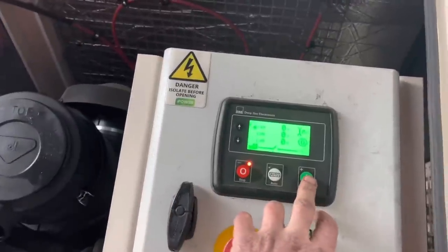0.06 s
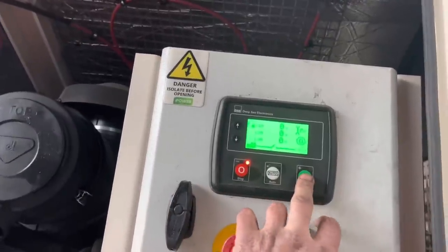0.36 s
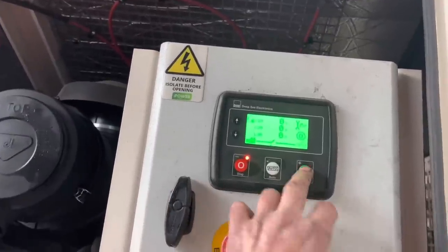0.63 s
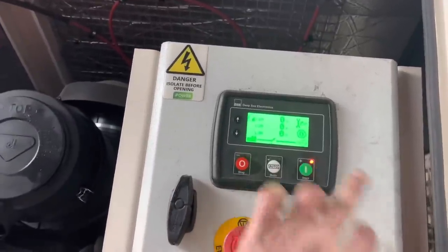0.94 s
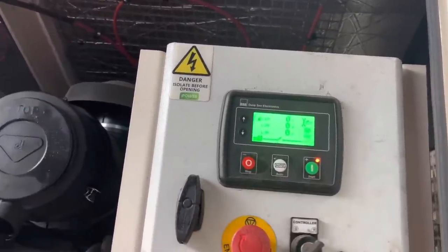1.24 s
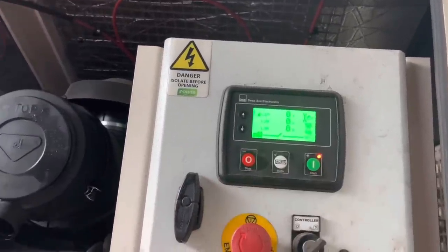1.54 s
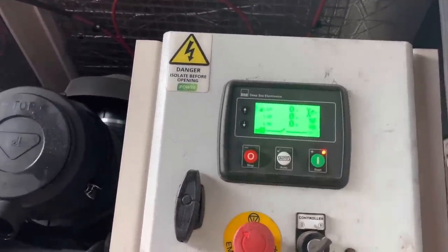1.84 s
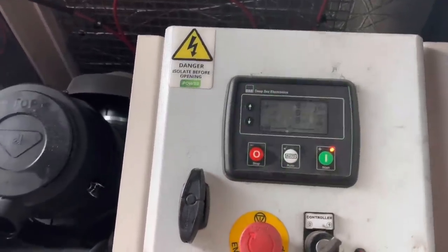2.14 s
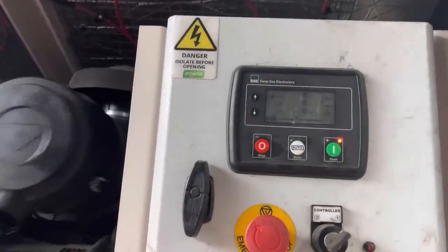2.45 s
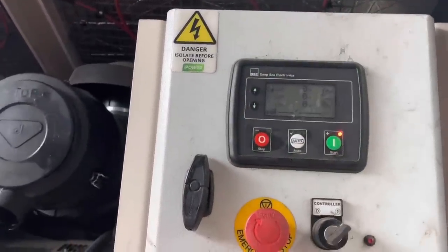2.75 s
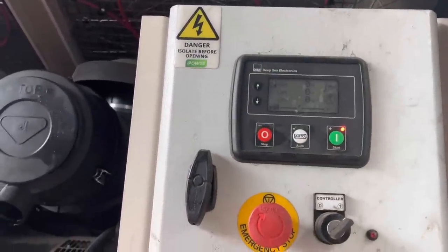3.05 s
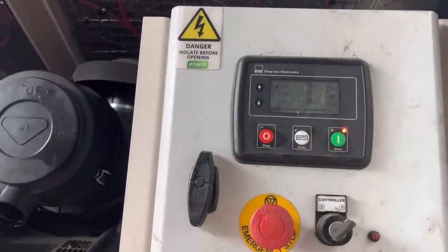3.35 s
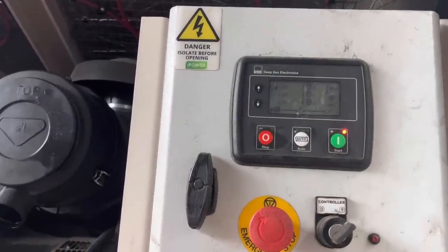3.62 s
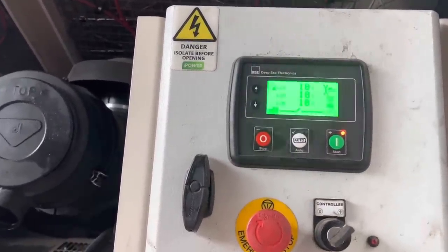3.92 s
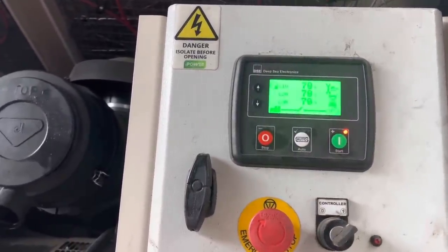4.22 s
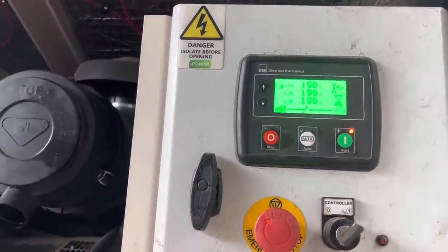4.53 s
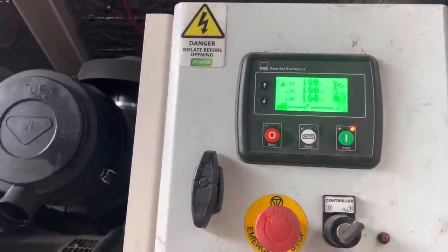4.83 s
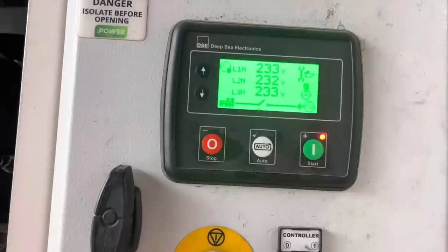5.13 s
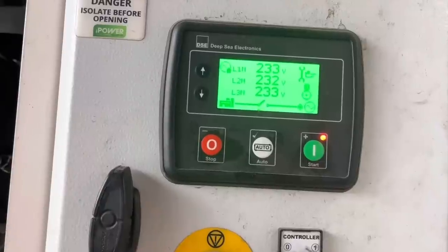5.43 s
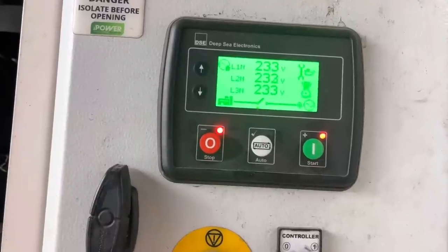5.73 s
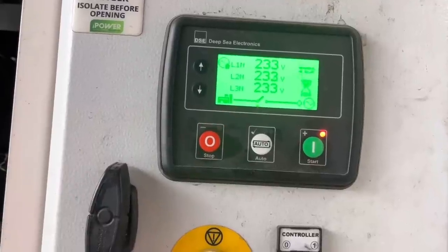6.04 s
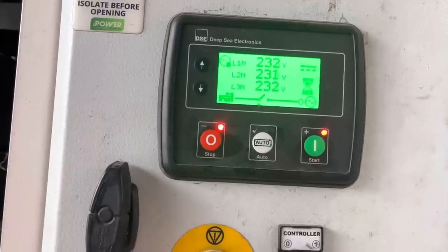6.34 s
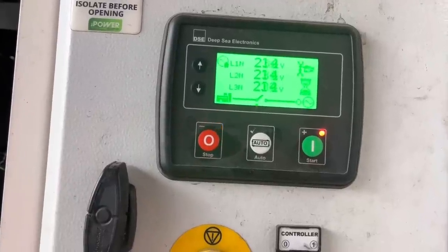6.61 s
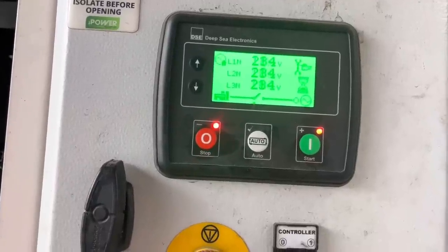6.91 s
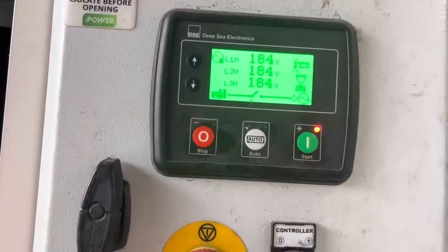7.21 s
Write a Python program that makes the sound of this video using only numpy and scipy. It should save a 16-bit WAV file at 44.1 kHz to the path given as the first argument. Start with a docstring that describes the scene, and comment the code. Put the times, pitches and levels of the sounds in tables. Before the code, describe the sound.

Over a low yard rumble, a small pump buzzes faintly, a sleeve swishes and a panel button clicks. A starter clunks in and cranks with a rasping whine. The diesel generator catches, revs up loudly and settles into a booming, slightly limping knock. Then the fuel is cut and the engine slows, chugging with ticking gears. It is all heard from close by.

```python
"""A yard rumbles low and a small pump buzzes; a sleeve swishes and a button clicks on a generator's panel.
The starter slams in and cranks a four-cylinder diesel, which catches, overshoots and settles to a limping knock.
Then the fuel is cut back and it coasts down, its slack gears ticking.
One crank angle times the engine's sounds: periodic pressure pulses boom through the exhaust,
while combustion and metal impacts excite the resonances of block, head and canopy."""
import sys
import numpy as np
from scipy import signal
from scipy.fft import rfft, irfft, next_fast_len
from scipy.io import wavfile
from scipy.ndimage import uniform_filter1d, map_coordinates

SR = 44100
rng = np.random.default_rng(int(sys.argv[2]) if len(sys.argv) > 2 else 0)


def master_out(mix):
    """Clip the mix to full scale and print it as 16-bit PCM to the path in sys.argv[1]."""
    frames = np.transpose(np.atleast_2d(mix))
    ceiling = np.clip(frames, -1, 1)
    pcm = np.round(ceiling * 32767).astype(np.int16)
    wavfile.write(sys.argv[1], SR, pcm)


N = 329427


def amp(db):
    """Decibels to amplitude ratio."""
    return np.exp(np.asarray(db) * (np.log(10) / 20))


def unit(x):
    """Normalisation to rms 1."""
    return x / np.sqrt(np.mean(x ** 2) + 1e-20)


def clock():
    """The time of each sample in seconds."""
    return np.arange(N) / SR


def curve(rows):
    """Linear interpolation of (time_s, value) rows at each sample."""
    return np.interp(clock(), *np.transpose(rows))


def along(points, hz):
    """Interpolation of (frequency_hz, value) points on a log axis."""
    f, v = np.transpose(points)
    return np.interp(np.log(hz + 1), np.log(f), v)


def wobble(rate):
    """Smooth random modulation, rate knots a second."""
    t = clock()
    coarse = t[::16]
    knots = rng.standard_normal(int(N * rate / SR) + 4)
    return np.interp(t, coarse, map_coordinates(knots, [coarse * rate]))


def filtered(x, response):
    """Linear filtering: the spectrum times a frequency response."""
    size = next_fast_len(N + SR // 2)
    return irfft(rfft(x, size) * response(np.fft.rfftfreq(size, 1 / SR)), size)[..., :N]


def colour(points):
    """The response through (frequency_hz, level_db) points."""
    return lambda hz: amp(along(points, hz))


def resonances(modes):
    """Modal superposition of (pitch_hz, bandwidth_hz, level_db) resonators."""
    return lambda f: sum((-1) ** k * amp(db) * 1j * f * width / (hz * hz - f * f + 1j * f * width)
                         for k, (hz, width, db) in enumerate(modes))


def noise(response):
    """Two uncorrelated coloured noises of rms 1."""
    return unit(filtered(rng.standard_normal((2, N)), response))


def tone(turns):
    """A sinusoid of rms 1."""
    return np.sqrt(2) * np.cos(2 * np.pi * turns)


def ringing(modes):
    """Two sets of sustained modes, their lines broadened by random phase modulation."""
    return np.array([sum(amp(db + wobble(25)) * tone(hz * clock() + 0.23 * wobble(width))
                         for hz, width, db in modes) for _ in range(2)])


def decay(start, t60, attack):
    """The exponential decay of one impact."""
    age = np.maximum(clock() - start, 0)
    return (1 - np.exp(-age / attack)) * amp(-60 * age / t60)


def ramp(start, rise):
    """A linear rise from 0 to 1 in rise seconds."""
    return np.clip((clock() - start) / rise, 0, 1)


def swell(start, attack, end, t60):
    """An envelope that rises, holds until its end and decays."""
    return ramp(start, attack) * amp(-60 * np.maximum(clock() - end, 0) / t60)


def swells(rows):
    """A sum of swells, each at its own level."""
    return sum(amp(db) * swell(*timing) for *timing, db in rows)


def beat(turns, life, attack=0.0028):
    """A periodic envelope: it rises at each whole turn and decays with time constant life."""
    age = (turns % 1) / np.maximum(np.gradient(turns) * SR, 1)
    return np.exp(-age / life) * (1 - np.exp(-age / attack))


def impulses(times, sizes):
    """Band-limited impulses, placed between samples by sinc interpolation."""
    at = times[:, None] * SR
    taps = np.floor(at).astype(int) + np.arange(-7, 9)
    kernel = np.sinc(taps - at) * np.sinc((taps - at) / 8)
    return np.bincount(np.clip(taps, 0, N - 1).ravel(), (sizes[:, None] * kernel).ravel(), N)


# course of the rumble: time_s, level_db
YARD_LEVEL = [(0, -19), (2.05, -20.5), (2.2, -24), (7.47, -28.5)]
# spectra of the rumble and the air: frequency_hz, level_db
RUMBLE_SPECTRUM = [(20, -14), (42, -4), (80, 0.5), (130, -8), (200, -11.5), (300, -23.5), (480, -32),
                   (1200, -90)]
AIR_SPECTRUM = [(300, -2), (600, 3), (1200, -4.5), (5500, -15.5), (8200, -55), (11000, -35), (15000, -60)]


def yard():
    """Ambient noise: distant machinery adds two hum lines to a continuous spectrum."""
    hum = amp(-9.5 + 0.77 * wobble(4.87)) * tone(81 * clock() + 0.27 * wobble(6))
    hum += amp(-21.5) * tone(200 * clock() + 0.11 * wobble(5.4))
    rumble = 0.62 * noise(colour(RUMBLE_SPECTRUM))
    return amp(curve(YARD_LEVEL)) * (rumble + hum) + amp(-43) * noise(colour(AIR_SPECTRUM))


# pump runs: start_s, attack_s, end_s, t60_s, level_db
PUMP_BURSTS = [(-.05, 0.14, 0.369, 0.068, -38), (.98, 0.029, 1.18, 0.09, -40.5),
               (1.45, 0.2, 2.2, 0.23, -44.5)]
# pump resonances: pitch_hz, bandwidth_hz, level_db
PUMP_MODES = [(754, 97, 1.5), (1030, 51, 3), (1447, 81, 3), (2130, 150, -1), (2777, 45, 2.5),
              (3390, 170, -5.5), (3774, 65, -3)]


def pump():
    """Resonance: a small pump buzzes in bursts of narrow-band noise."""
    return swells(PUMP_BURSTS) * noise(resonances(PUMP_MODES))


# arm movements: start_s, attack_s, end_s, t60_s, level_db
SLEEVE_STROKES = [(.76, 0.032, 0.8, 0.37, -27), (.85, 0.062, 1.045, 0.39, -26),
                  (1.78, 0.076, 1.86, 0.49, -30)]
# rubbing cloth: frequency_hz, level_db
SLEEVE_SPECTRUM = [(90, -14), (185, 0.5), (320, -10), (480, -18.5), (1000, -16), (1400, -27), (3700, -29),
                   (7300, -43), (12000, -53.5)]


def sleeve():
    """Friction noise: cloth swishes with each stroke."""
    return swells(SLEEVE_STROKES) * amp(1.7 * wobble(49.03)) * noise(colour(SLEEVE_SPECTRUM))


# button and relay: start_s, level_db
PANEL_CLICKS = [(0.8104, -16), (.8212, -31), (1.207, -27.5)]
# struck plastic: frequency_hz, level_db
PLASTIC_SPECTRUM = [(800, -30), (2000, 1), (7000, -1), (12000, 0), (15500, -9)]


def clicks():
    """Impact transients: a brief contact gives a broadband snap with a faint tail."""
    snaps = sum(amp(db) * (decay(s, 0.0049, attack=0.00027) + 0.11 * decay(s, 0.1, attack=.001))
                for s, db in PANEL_CLICKS)
    return snaps * noise(colour(PLASTIC_SPECTRUM))


def hiss():
    """Broadband noise: a faint hiss swells as the relay clicks."""
    envelope = amp(-59.5) + amp(-53.5) * swell(start=1.18, attack=0.028, end=1.9, t60=1.2)
    spectrum = colour([(1500, -5), (4000, 0.5), (7000, -2), (8400, -24), (11000, -1), (15000, -21)])
    return envelope * noise(spectrum)


# solenoid, pinion and first compressions: start_s, level_db, t60_s, frame_weight_db
STEEL_IMPACTS = [(1.913, -22.5, 0.13, 5.5), (1.924, -18, 0.11, -14), (1.942, -24.5, 0.2, 11.5),
                 (2.246, -22.5, 0.21, 1.5), (2.352, -28, 0.12, 3), (2.424, -27, 0.18, 0),
                 (2.457, -16, 0.14, -7.5), (2.48, -25.5, 0.077, 12.5), (3.262, -18.5, 0.12, -7),
                 (3.481, -15.5, 0.06, -19)]
# struck casing and frame: frequency_hz, level_db
CASING_SPECTRUM = [(550, -38), (980, -0.5), (1900, 0.5), (4600, -1), (7000, -11.5), (8500, -25),
                   (12000, -5.5), (15000, -35.5)]
FRAME_SPECTRUM = [(90, -37), (160, -15), (340, -0.5), (570, -6), (1200, -11.5), (3000, -48)]
# the block rocks on its mounts: centre_s, level_db
BLOCK_HEAVES = [(2.06, -30), (2.326, -23), (2.447, -13)]


def clunks():
    """Impact excitation: steel contacts ring the dense modes of casing and frame; the block heaves."""
    crash = sum(amp(db) * decay(s, t60, attack=0.0012) for s, db, t60, _ in STEEL_IMPACTS)
    knock = sum(amp(db + frame_db) * decay(s, t60, attack=0.0066)
                for s, db, t60, frame_db in STEEL_IMPACTS)
    t = clock()
    heave_hz, width_s = 65, 0.018
    heave = sum(amp(db) * np.cos(2 * np.pi * heave_hz * (t - s)) * np.exp(-((t - s) / width_s) ** 2)
                for s, db in BLOCK_HEAVES)
    return crash * noise(colour(CASING_SPECTRUM)) + knock * noise(colour(FRAME_SPECTRUM)) + heave


# spells of rasp, pinion ring and whine: start_s, attack_s, end_s, t60_s, level_db
STARTER_RASPS = [(1.95, 0.22, 2.14, 0.26, -25.5), (2.2, 0.055, 2.9, 7.3, -30.5)]
PINION_GRINDS = [(2.04, .015, 2.15, .15, -3), (2.255, .015, 2.3, .2, 1), (2.35, .012, 2.44, .2, -2),
                 (2.6, .08, 3.28, 1.5, -3)]
MOTOR_SQUEALS = [(2, 0.018, 2.07, .1, -41.5), (2.048, .006, 2.07, 0.16, -41),
                 (2.146, 0.0057, 2.162, .22, -31.5)]
# scraping teeth: frequency_hz, level_db
RASP_SPECTRUM = [(200, 2), (400, 6.5), (1500, -2.5), (2600, 0.5), (5100, 6.5), (5600, -10), (7000, -5),
                 (8400, -46), (11000, -1.5), (13500, -20), (15000, -52)]
# pinion resonances: pitch_hz, bandwidth_hz, level_db
PINION_MODES = [(4585, 45, -40), (4660, 45, -41), (4915, 110, -42)]
# the motor spins up: time_s, pitch_hz
MOTOR_PITCH = [(1.97, 1690), (2.02, 2210), (2.055, 2540), (2.125, 2500), (2.15, 3200), (2.17, 3730),
               (2.2, 3940), (2.24, 4540)]


def starter():
    """Gear noise: the pinion rasps and rings on the flywheel; the motor's whine rises with speed."""
    rasp = swells(STARTER_RASPS) * amp(1.9 * wobble(140)) * 0.68 * noise(colour(RASP_SPECTRUM))
    ring = swells(PINION_GRINDS) * amp(3.9 * wobble(45)) * ringing(PINION_MODES)
    hz = curve(MOTOR_PITCH) * (1 + .04 * wobble(900))
    whine = swells(MOTOR_SQUEALS) * amp(3.5 * wobble(260)) * tone(np.cumsum(hz) / SR)
    return rasp + ring + whine


# run-up, overshoot, governed running, coast-down: time_s, firing_rate_hz
FIRING_RATE = [(2.2, 5), (2.45, 14.5), (2.55, 22.5), (3, 42.8), (3.3, 54.3), (3.45, 55.5), (3.7, 51.8),
               (3.9, 49.7), (4.8, 50), (5.73, 49.85), (6.5, 37.9), (7.47, 24.1)]
# the governor opens, backs off, holds and cuts back: time_s, opening_fraction
FUEL_RACK = [(2.42, 0.3), (2.56, 1), (3.26, 0.83), (3.37, 0), (3.72, 0.21), (3.92, 0.3), (5.72, 0.28),
             (5.77, 0.22)]
RATED_HZ = 50
COAST_FROM_S, COAST_RISE_S = 5.7, 0.16
KNOCK_LEAD = .27  # share of a firing by which combustion precedes the exhaust pulse


def controls():
    """The operating point: speed in octaves above rated, and the fuel rack's opening."""
    return np.log2(curve(FIRING_RATE) / RATED_HZ), np.clip(curve(FUEL_RACK), 0, 1)


def fired():
    """Firing strength: it saturates at 1 and falls steeply as the rack closes."""
    return np.clip(controls()[1] / 0.31, 0, 1) ** 3.7


def vibration(turning_db, db_per_octave, burning_db, dry_db):
    """Incoherent sources add in power: turning, burning, and rattling until the oil arrives."""
    octaves, fuel = controls()
    turning = amp(turning_db + db_per_octave * octaves)
    burning = fuel * amp(burning_db + 9 * octaves)
    unoiled = amp(dry_db) * swell(start=2.3, attack=0.054, end=2.99, t60=5.1)
    return np.sqrt(turning ** 2 + burning ** 2 + unoiled ** 2)


def contacts(cycle, jitter, scatter, count=14):
    """Cyclic impacts: parts meet at the same crank angles, a little differently each time."""
    angle = (np.arange(count) + rng.random(count)) / count
    turns = (np.arange(np.floor(cycle[0]), cycle[-1])[:, None] + angle).ravel()
    chance = rng.standard_normal((len(turns), 2))
    times = np.interp(turns, cycle, clock()) + jitter * chance[:, 0]
    sizes = np.resize(rng.choice([-1, 1], count), len(turns)) * (1 + scatter * chance[:, 1])
    sizes /= np.sqrt(np.interp(turns, cycle, np.gradient(cycle)))  # equal power at any speed
    inside = (turns > cycle[0]) & (turns < cycle[-1])
    return impulses(times[inside], sizes[inside])


def shaking(cycle, jitter, scatter, t60, groups=3):
    """Convolution: each group of parts rings through the housing along its own two paths."""
    t = np.arange(SR // 10) / SR
    paths = rng.standard_normal((groups, 2, len(t))) * amp(-60 * t / t60)
    return sum(signal.oaconvolve(contacts(cycle, jitter, scatter)[None], pair, axes=1)[:, :N]
               for pair in paths)


# block, head and covers: frequency_hz, level_db
BLOCK_SPECTRUM = [(80, -10), (140, 3), (240, -2), (310, -5), (400, -12.5), (490, -8), (550, -8), (640, -44),
                  (1200, -79)]
KNOCK_SPECTRUM = [(400, -73), (650, -3), (770, 3.5), (870, 0.5), (990, 2.5), (1150, -3), (1450, -0.5),
                  (1630, 2), (1950, -4), (2400, -4.5), (4000, -80)]
CLATTER_SPECTRUM = [(1300, -3.5), (2300, -0.5), (3200, 2.5), (4700, -1), (5700, -5), (7200, -4.5),
                    (8300, -49), (9700, -6), (12000, -8.5), (14200, -11.5), (15500, -76)]
# sheet steel panels and cylinder head: pitch_hz, bandwidth_hz, level_db
CANOPY_MODES = [(343.5, 17, -6), (520.6, 14.5, -9)]
HEAD_MODES = [(720, 9.8, -16.5), (982, 9, 6), (1096, 47, -13), (1450, 85, 5.5), (1639, 21, -9),
              (2537, 100, -16), (2890, 27, -21)]


def engine_body(cycle):
    """Structure-borne sound: combustion and valve gear shake the block, head and covers."""
    octaves, fuel = controls()
    firing = 4 * cycle + KNOCK_LEAD
    drive = np.sqrt(amp(-6.5 + 17.5 * octaves + 14.5 * fuel))
    running = 1 - ramp(COAST_FROM_S, COAST_RISE_S)
    # under full fuel every firing cracks out of the rattle
    punch = 1 + running * (0.58 + 0.7 * fuel ** 2) * amp(2 * wobble(35)) * beat(firing, life=0.013)
    punch /= uniform_filter1d(punch, SR // 10)
    shudder = unit(0.91 + beat(firing, life=0.0063))
    block = 0.96 * noise(colour(BLOCK_SPECTRUM)) + 0.39 * drive * noise(resonances(CANOPY_MODES))
    block *= shudder * vibration(turning_db=-30, db_per_octave=12.5, burning_db=-34.5, dry_db=-24.5)
    sharp = shaking(cycle, jitter=.00004, scatter=0.31, t60=0.06)
    knock = 1.07 * unit(filtered(sharp, colour(KNOCK_SPECTRUM)))
    knock += 0.58 * running * drive * unit(filtered(sharp, resonances(HEAD_MODES)))
    knock *= vibration(turning_db=-37.5, db_per_octave=19, burning_db=-27.5, dry_db=-36)
    rattle = shaking(cycle, jitter=.00005, scatter=0.48, t60=0.082)
    clatter = unit(filtered(rattle, colour(CLATTER_SPECTRUM)))
    clatter *= vibration(turning_db=-34, db_per_octave=14.5, burning_db=-55, dry_db=-27.5)
    return ramp(2.176, 0.34) * (block + punch * (knock + clatter))


def thuds(turns, shape):
    """Gaussian wave packets: one low pulse just after every whole turn."""
    lag = (turns - np.round(turns)) / (np.gradient(turns) * SR) - .002
    return sum(-amp(db) * np.sin(2 * np.pi * hz * lag) * np.exp(-(lag / width) ** 2)
               for hz, width, db in shape)


# exhaust harmonics: firing_multiple, level_db, full_fuel_rise_db, speed_db_per_octave
EXHAUST_HARMONICS = [(1, 1.5, 2, -1), (2, -1.5, 18, 10.5), (3, 2, 13, 7)]
# what the pipe passes: frequency_hz, gain_db
PIPE_RESPONSE = [(24, -64), (30, -52), (38, -37), (44, -28), (50, -27.5), (55, -20), (62, -20), (72, -22.5),
                 (88, -24.5), (100, -30.5), (112, -30), (130, -45), (150, -34.5), (170, -56)]
# pulses of the heavy cylinder and of an unfired stroke: pitch_hz, width_s, level_db
THUMP_PULSE = [(114, 0.01, -1), (210, 0.011, -16.5)]
CHUG_PULSE = [(118, 0.0055, -24.5)]


def exhaust(cycle):
    """Source and filter: firings boom through the pipe; one cylinder thumps; coasting strokes chug."""
    octaves, fuel = controls()
    firing, firing_hz = 4 * cycle, curve(FIRING_RATE)
    boom = 0
    for k, db, fuel_db, slope_db in EXHAUST_HARMONICS:
        source_db = db + fuel_db * fuel ** 2 + slope_db * octaves + wobble(15)
        lag = 0.086 * (k - 1) ** 2  # the silencer delays higher harmonics more
        boom += amp(source_db + along(PIPE_RESPONSE, k * firing_hz)) * tone(k * firing - lag)
    boom *= amp(-4 * (1 - ramp(2.52, .2)))  # weaker until every cylinder has caught
    thump = ramp(3.15, 0.9) * amp(-15 + 13.5 * octaves) * thuds(cycle, THUMP_PULSE)
    chug = ramp(COAST_FROM_S, COAST_RISE_S) * amp(2.5 * wobble(30)) * thuds(firing, CHUG_PULSE)
    return boom + thump + chug


# housing tones: firing_multiple, level_db
HOUSING_HARMONICS = [(4, -39), (5, -34), (7, -32.5), (8, -48), (11, -47.5), (15, -46)]


def housing_drone(cycle):
    """Forced vibration: burning fuel drives the housing at multiples of the firing rate."""
    firing = 4 * cycle
    drone = sum(amp(db + 0.76 * wobble(22)) * tone(k * firing + rng.random() + 0.07 * wobble(30))
                for k, db in HOUSING_HARMONICS)
    return fired() * amp(16 * controls()[0]) * drone


def blows(cycle, places, modes, attack, jitter_s=.00009, scatter_db=1.5):
    """Impulse response: blows at set places in each cycle ring damped modes, each in its own way."""
    t = np.arange(SR // 8) / SR
    out = np.zeros((2, N))
    centre_hz = np.mean([mode[0] for mode in modes])
    for place, db, tilt_db in places:
        turns = np.arange(np.ceil(cycle[0]), cycle[-1] - 1) + place / 4
        chance = rng.standard_normal((len(turns), 2))
        times = np.interp(turns, cycle, clock()) + jitter_s * chance[:, 0]
        hits = impulses(times, amp(db + scatter_db * chance[:, 1]))
        ring = sum(amp(mode_db + tilt_db * np.log2(hz / centre_hz) - 60 * t / t60)
                   * tone(hz * t + rng.random((2, 1))) for hz, mode_db, t60 in modes)
        out += signal.oaconvolve(hits[None], ring * (1 - np.exp(-t / attack)), axes=1)[:, :N]
    return out


# ring of a cold, full-fuel knock: pitch_hz, bandwidth_hz, level_db
COLD_MODES = [(1125, 360, -21.5), (1870, 360, -30.5), (2780, 800, -24.5), (4100, 830, -28),
              (4850, 400, -26)]
# blows of one cycle: place_firings, level_db, tilt_db_per_octave
CYLINDER_BLOWS = [(.66, -1, -3), (1.72, -9, 0), (2.55, 1, 4), (2.82, -1, 3), (3.78, -9, -4)]
# ring of a governed knock: pitch_hz, level_db, t60_s
GOVERNED_MODES = [(788, -35.5, 0.096), (988, -33.5, 0.11), (1105, -29.5, 0.072), (1196, -33.5, 0.12),
                  (1308, -27.5, 0.035), (1634, -31.5, 0.056), (1750, -30.5, 0.035), (1915, -30.5, .04),
                  (2597, -33.5, 0.052), (2935, -37, 0.058)]


def diesel_knock(cycle):
    """Shock excitation: firings ring the metal, bright on full fuel, then duller and limping."""
    governed = fired() * ramp(2.53, 0.3) * blows(cycle, CYLINDER_BLOWS, GOVERNED_MODES, attack=0.0019)
    cold_ring = sum(amp(db + 3.5 * wobble(30.02)) * noise(lambda f: resonances([(hz, width, 0)])(f) ** 2)
                    for hz, width, db in COLD_MODES)
    cold = swell(start=2.51, attack=.02, end=3.27, t60=0.17)
    return governed + cold * beat(4 * cycle + KNOCK_LEAD, life=0.0058) * cold_ring


# shoves of one cycle: place_firings, level_db, tilt_db_per_octave
CANOPY_SHOVES = [(0.901, -2, 3), (1.819, -1, -1), (3.2, -7, 2), (3.849, -8, -8.5)]
# ring of the sheets: pitch_hz, level_db, t60_s
SHEET_MODES = [(271.6, -22, 0.057), (342.4, -24, 0.11), (521.5, -23.5, 0.068), (557, -35.5, 0.062)]


def canopy(cycle):
    """Plate vibration: the rocking engine drums the canopy's sheets, hardest during the run-up."""
    strength = vibration(turning_db=-9.5, db_per_octave=29, burning_db=1.5, dry_db=3.5)
    return ramp(2.57, .16) * strength * blows(cycle, CANOPY_SHOVES, SHEET_MODES, attack=0.0022)


# spells of gear whine: start_s, attack_s, end_s, t60_s, level_db
GEAR_WHINES = [(3.22, 0.2, 3.55, 1.9, -37), (6, 0.22, 6.26, 0.35, -44)]


def gear_whine(cycle):
    """Tooth meshing: an unloaded gear sings at 17 times the firing rate."""
    mesh = 17 * 4 * cycle
    return swells(GEAR_WHINES) * amp(2.8 * wobble(30)) * tone(mesh + 0.15 * wobble(70))


# other steel parts and the slack gears: pitch_hz, bandwidth_hz, level_db
STEEL_MODES = [(500, 57, 4), (1130, 38, -11), (1925, 110, 2), (2960, 720, -7), (3570, 500, -2.5)]
GEAR_MODES = [(480, 60, -31), (1166, 45, -25), (1885, 120, -33)]


def gear_ticks(cycle):
    """Backlash: slack gears tick once a compression as the engine coasts; other steel rings along."""
    stroke = 4 * cycle + .33 + .72 * controls()[0]  # the teeth meet later as speed falls
    limp = .05 * np.cos(np.pi * stroke)  # and in pairs
    taps = beat(stroke + limp, life=0.0049, attack=0.0097)
    steel = amp(-43.5) * ramp(5.63, 0.86) * unit(0.051 + taps) * noise(resonances(STEEL_MODES))
    return steel + ramp(5.828, 0.89) * 2 * taps * ringing(GEAR_MODES)


# share of the direct path in the side signal: frequency_hz, coherence_ratio
SIDE_COHERENCE = [(200, 0.34), (600, 0.19), (4000, 0.53), (9000, 0.19)]
# stereo width: frequency_hz, side_over_mid_db
SIDE_LEVEL = [(60, -24), (120, -19), (250, -22), (400, -2.5), (700, 3.5), (1300, 3.5), (2400, -3),
              (4500, -2), (8200, 7), (13000, -7.5)]
# balance: frequency_hz, left_over_right_db
BALANCE = [(120, -1), (280, -4.5), (600, 1.5), (1200, 1), (2300, 2), (4400, 5.5), (8000, -0.5)]


def stereo(pair):
    """Partial coherence: a direct path differs in phase between the ears, a second adds width."""
    direct, second = pair
    coherence = lambda hz: np.clip(along(SIDE_COHERENCE, hz), 0, 1)
    side = filtered(direct, lambda hz: 1j * coherence(hz))
    side += filtered(second, lambda hz: np.sqrt(1 - coherence(hz) ** 2))
    side = filtered(side, colour(SIDE_LEVEL))
    ears = np.array([direct + side, direct - side])
    return filtered(ears, lambda hz: amp(np.outer([.5, -.5], along(BALANCE, hz))))


def scene():
    """Superposition of all sources; one crankshaft, four firings a cycle, times the engine."""
    cycle = np.cumsum(curve(FIRING_RATE)) / SR / 4
    cycle += .0875 * ramp(4.9, .02)  # the beat skips ahead once
    cycle -= np.interp(5.193, clock(), cycle)  # the heavy cylinder fires at this time
    opening = yard() + pump() + sleeve() + clicks() + hiss() + clunks() + starter()
    engine = engine_body(cycle) + exhaust(cycle) + housing_drone(cycle) + diesel_knock(cycle)
    return stereo(opening + engine + canopy(cycle) + gear_whine(cycle) + gear_ticks(cycle))


# bass roll-off: frequency_hz, gain_db
LOW_CUT = [(21, -24), (31, -4), (42, -.5)]
DIP_S, DIP_WIDTH_S, DIP_DB = 4.91, 0.017, -18
GAIN_DB, STEP_DB, TOP_HZ = 2.5, 1.3, 15700


def record(dry):
    """Band limiting and soft saturation; the level dips briefly and stays a little lower."""
    dip = amp(DIP_DB * np.exp(-((clock() - DIP_S) / DIP_WIDTH_S) ** 2))
    gain = amp(GAIN_DB - STEP_DB * ramp(DIP_S, DIP_WIDTH_S))
    x = filtered(dry * dip * gain, colour(LOW_CUT))
    x = x / (1 + np.abs(x) ** 8) ** (1 / 8)
    return filtered(x, lambda hz: hz < TOP_HZ)


dry = scene()
out = record(dry)
master_out(out)
```